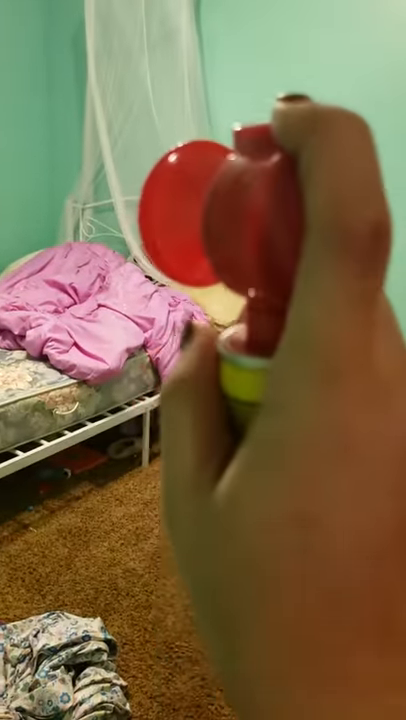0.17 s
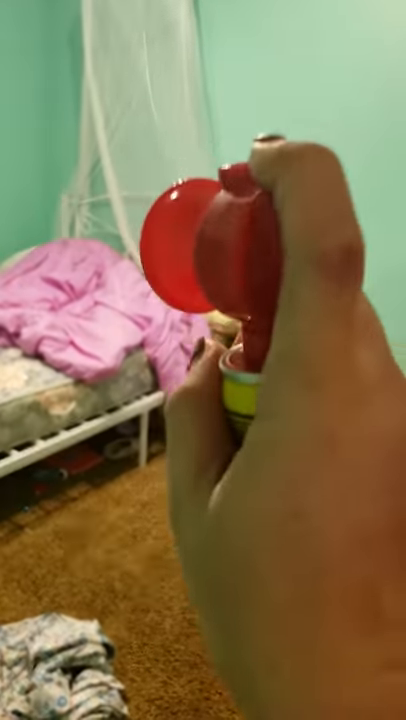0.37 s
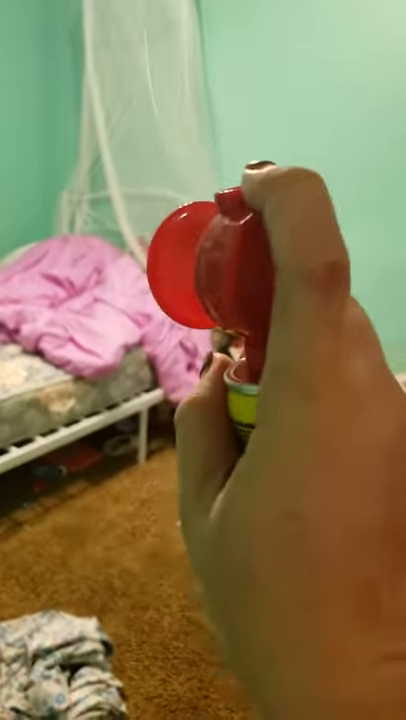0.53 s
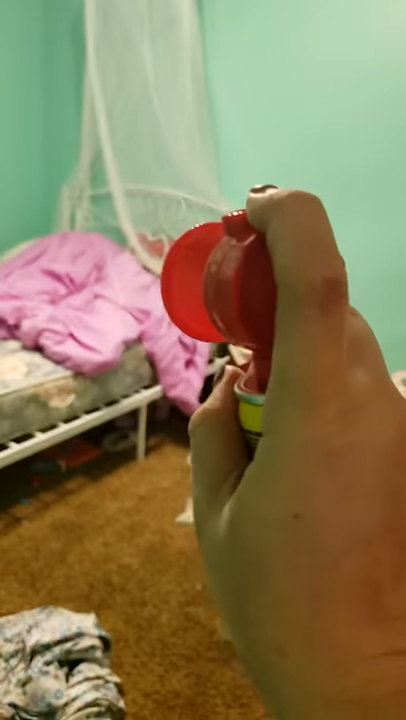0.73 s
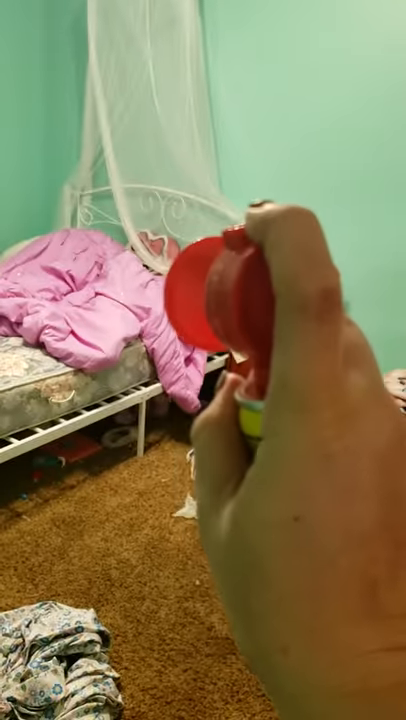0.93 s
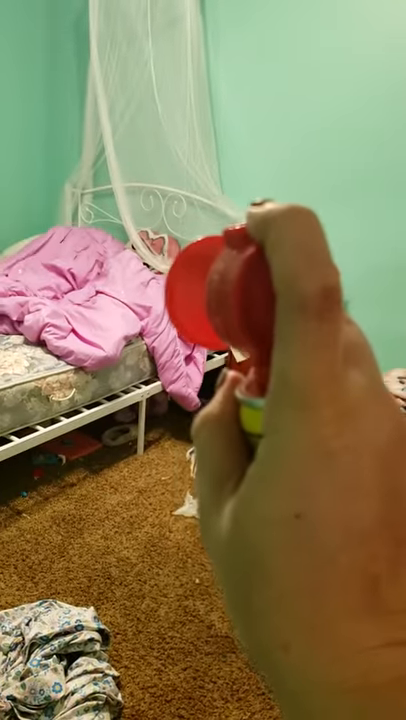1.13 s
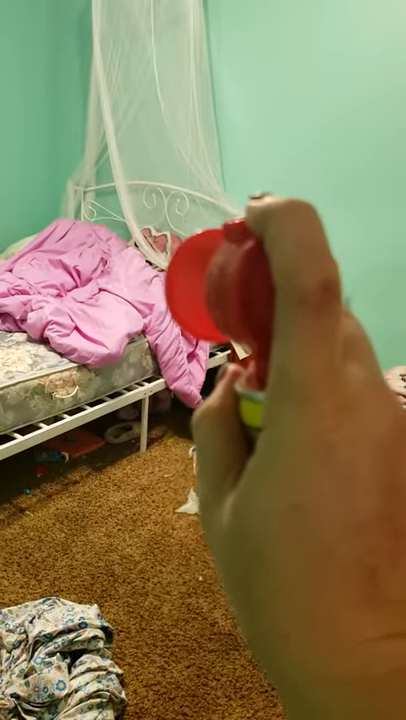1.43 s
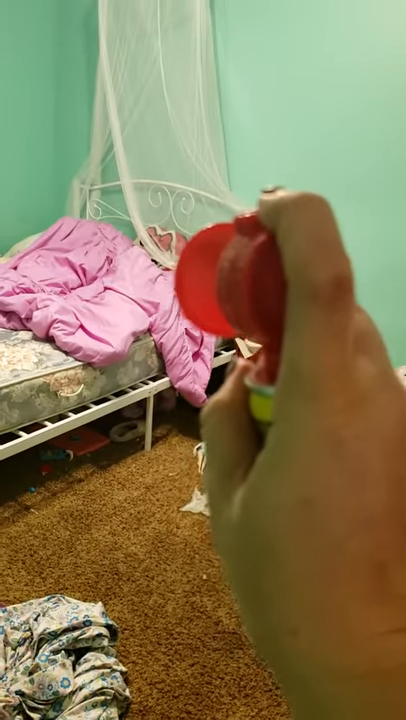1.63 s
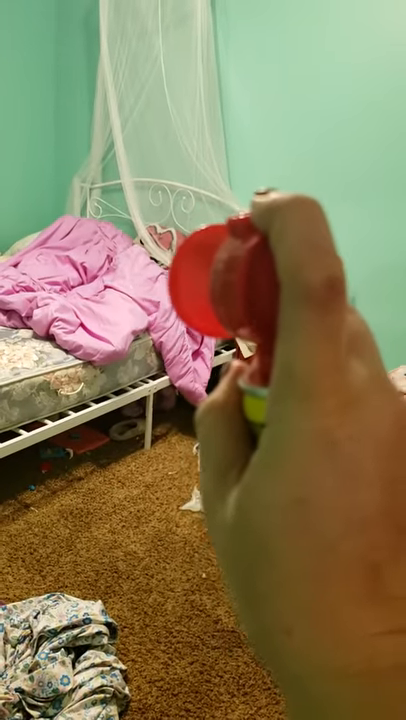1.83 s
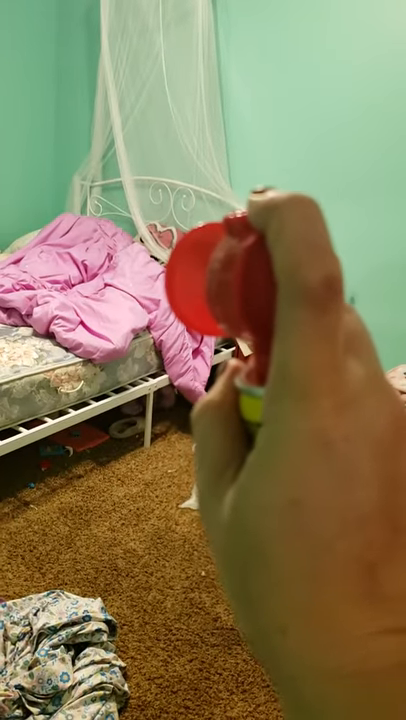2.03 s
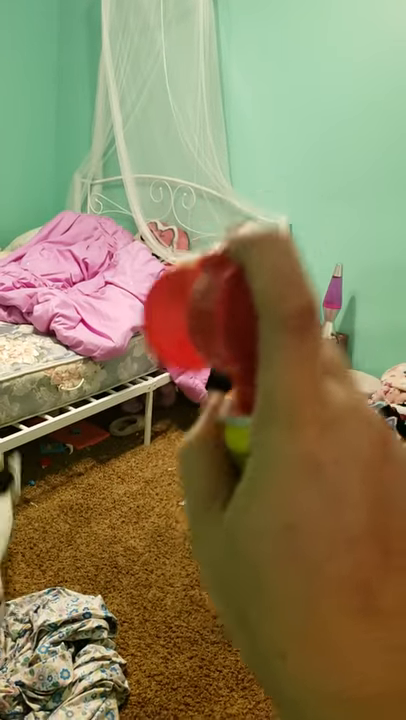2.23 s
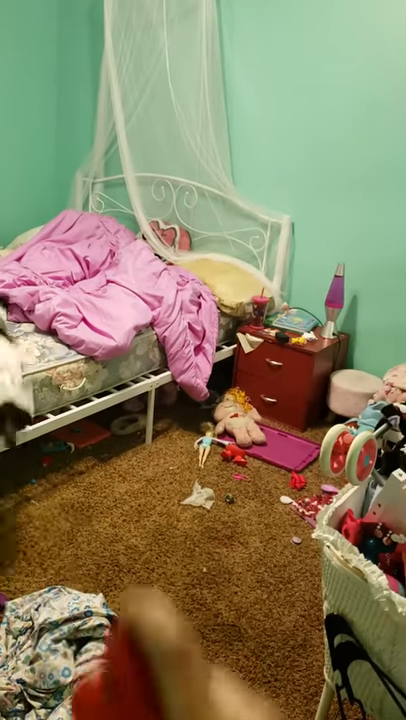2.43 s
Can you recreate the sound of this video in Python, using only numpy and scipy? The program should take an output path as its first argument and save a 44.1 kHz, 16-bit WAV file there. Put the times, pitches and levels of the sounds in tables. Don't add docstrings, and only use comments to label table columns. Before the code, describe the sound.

One piercing air horn blast, close to a phone microphone that clamps its level down; brief quiet room first, steady bright tone for about two seconds, sudden cutoff, faint gas spits and a short indoor tail.

```python
import sys
import numpy as np
from scipy import signal
from scipy.fft import rfft, irfft
from scipy.io import wavfile
from scipy.ndimage import uniform_filter1d, minimum_filter1d

SR = 44100
rng = np.random.default_rng(int(sys.argv[2]) if len(sys.argv) > 2 else 0)


def bounce(signal):
    frames = np.transpose(np.atleast_2d(signal))
    limited = np.clip(frames, -1, 1)
    pcm = np.round(limited * 32767).astype(np.int16)
    wavfile.write(sys.argv[1], SR, pcm)


def makeup_ratio(level_db):
    decades = np.asarray(level_db, float) / 20
    return 10 ** decades


N = 114660
CATCH_S, RISE_S = 0.2293, 0.013
SHUT_S, RELEASE_DB_PER_S = 2.337, 297

# frequency_hz, likeness [0-1]
COHERENCE = [(40, .9), (150, .75), (400, .5), (2000, .3)]


def evened(x):
    return x / np.sqrt(np.mean(x ** 2) + 1e-20)


def read(points, hz):
    f, value = np.transpose(points)
    return np.interp(np.log(hz + 1), np.log(f + 1), value)


def filtered(x, response):
    return irfft(rfft(x) * makeup_ratio(read(response, np.fft.rfftfreq(N, 1 / SR))), N)


def noise(colour, patchy_db):
    frames, hz = N // 256 + 5, np.fft.rfftfreq(1024, 1 / SR)
    a, b, c, d, patches = rng.standard_normal((frames, 513, 5)).T
    patches = uniform_filter1d(patches, size=14, axis=0)
    patches = evened(uniform_filter1d(patches, size=8, axis=1))
    like = np.clip(read(COHERENCE, hz), -1, 1)[:, None]
    left = a + 1j * b
    right = like * left + np.sqrt(1 - like ** 2) * (c + 1j * d)
    spectra = np.array([left, right])
    spectra *= makeup_ratio(read(colour, hz)[:, None] + patchy_db * patches)
    return evened(signal.istft(spectra, nperseg=1024, noverlap=768)[1][:, :N])


def drift(top_hz):
    t = np.arange(N) / SR
    rates_hz = np.geomspace(2, top_hz, num=16)
    return evened(sum(np.sin(2 * np.pi * (f * t + rng.random())) / np.sqrt(f) for f in rates_hz))


def lag(x, s):
    r = np.exp(-1 / (s * SR))
    return signal.lfilter([1 - r], [1, -r], x)


def valve(t):
    return makeup_ratio(-RELEASE_DB_PER_S * np.maximum(t - SHUT_S, 0))


def room_floor():
    # frequency_hz, density_db [dB per Hz]
    floor_colour = [(15, -35.5), (25, -7), (97, -5), (354, -25), (911, -41), (1740, -34.5), (2050, -43.5),
                    (2550, -45.5), (16000, -31.5)]
    quiet = makeup_ratio(-53.5) * noise(floor_colour, 3)
    low = signal.sosfilt(signal.butter(2, 300, fs=SR, output="sos"), quiet)
    return quiet + low * (makeup_ratio(2.5 * drift(16) - 1.5) - 1)


def gas(t):
    # frequency_hz, density_db [dB per Hz]
    gas_colour = [(1000, -42), (1700, 3), (2800, -16), (3900, 3.5), (5200, -26), (7500, -2.5), (9000, 1),
                  (12500, -5.5)]
    # frequency_hz, density_db [dB per Hz]
    jet_colour = [(3000, -29.5), (6000, -14.5), (9000, -3), (12500, -0.5), (15500, 4)]
    # frequency_hz, density_db [dB per Hz]
    spit_colour = [(3000, -45), (4500, -23.5), (7000, -13.5), (10000, -13.5), (12500, 1.5), (15000, -14)]
    # centre_s, length_s, level_db
    spit_events = [
        (1.349, 0.081, -45),
        (1.644, 0.049, -28),
        (2.237, 0.036, -38),
        (2.54, 0.035, -48),
        (2.595, 0.054, -39),
    ]
    age = np.maximum(t - CATCH_S, 0)
    caught = np.minimum(age / RISE_S, 1)
    opening = np.clip((t - 0.19) / 0.035, 0, 1)
    opening = opening * np.exp(-age / 0.04) * makeup_ratio(-41 + 15.5 * caught)
    jet = makeup_ratio(-37.5) * caught * valve(t)
    spits = sum(makeup_ratio(db) * np.exp(-((t - s) / (length / 2)) ** 2) for s, length, db in spit_events)
    hiss = opening * noise(gas_colour, 4)
    hiss = hiss + jet * noise(jet_colour, 4.4) + spits * noise(spit_colour, 2.1)
    pan_db = -3.5
    return hiss * makeup_ratio([[pan_db / 2], [-pan_db / 2]])


def horn(t):
    # time_s, pitch_hz
    note_path = [(.2, 999.7), (.5, 1017), (.68, 1013), (.82, 1009), (1, 1010), (1.14, 1011), (1.4, 1010.7),
                 (1.62, 1011), (1.74, 1007), (1.96, 1008), (2.1, 1004), (2.3, 1005), (2.37, 1019),
                 (2.45, 1034)]
    # time_s, turn_db [toward the right port]
    aim_path = [(.2, -1.5), (.5, 7.5), (.7, 6), (1, 5), (1.3, 6.5), (1.6, 7.5), (1.75, 17.5), (2.05, 12),
                (2.25, 15.5), (2.4, 17.5)]
    # left_db, right_db, left_loss [share of turn], right_gain [share of turn]
    overtones = [(0, -1.5, 0.65, .3), (5, -0.5, 0.46, .2), (-2, -5.5, 0.74, 0.13),
                 (-27.5, -25, -1.1, 0.045), (-38, -31.5, 1, 0.06), (-35.5, -35.5, -1.1, 0.28),
                 (-41, -32, 1, 0.074), (-42.5, -27.5, -0.035, 0.21), (-50.5, -29, 0.33, 0.036),
                 (-30, -38.5, 0.65, .1), (-40, -32.5, 0.41, .1), (-51, -32, .1, .1), (-40.5, -29.5, .1, .1),
                 (-36.5, -37.5, .1, .1), (-33.5, -32, .1, .1)]
    # frequency_hz, lead_rad
    phase_lead = [(1000, 1.7), (2000, 2.1), (3000, .9), (4000, 1.8)]
    # frequency_hz, gain_db
    bell_response = [(1000, 3.5), (2000, 12.5), (2800, -1), (4000, -14.5), (6000, -9.5), (8500, -1),
                     (11500, 4.5), (16000, 7.5)]
    # centre_s, width_s, frequency_hz, left_db, right_db
    nulls = [
        (0.49, 0.25, 2020, 3, -6.5),
        (0.52, 0.26, 3030, -14.5, -11.5),
        (2.33, 0.086, 2020, -13.5, -9.5),
        (1.73, 0.15, 6060, -16.5, -20),
        (2.3, 0.1, 4040, -7, -6),
        (.42, 0.095, 4040, 4.5, 12),
        (1.7, 0.14, 4040, -11, -9.5),
        (0.39, 0.076, 5050, 3.5, 8.5),
        (2, 0.49, 6060, -8, -8),
    ]
    slide_hz, slide_s = 896, 0.028
    bright_db, bright_s = 4, 0.12
    shimmer_db = 4
    nominal_hz = note_path[0][1]

    age = np.maximum(t - CATCH_S, 0)
    steady = uniform_filter1d(np.interp(t, *np.transpose(note_path)), size=2000) + .35 * drift(40)
    hz = steady + slide_hz * np.exp(-age / slide_s)
    phase = 2 * np.pi * np.cumsum(hz) / SR
    aim_db = np.interp(t, *np.transpose(aim_path))
    near, thrown, wander = np.zeros((2, N)), np.zeros(N), drift(35)
    for k, (left_db, right_db, lose, gain) in enumerate(overtones, start=1):
        upper = k > 3
        edge_db = bright_db * upper * np.exp(-age / bright_s)
        edge = makeup_ratio(edge_db + read(bell_response, k * hz) - read(bell_response, k * steady))
        late_s = 0.0029 * min(k - 1, 3)
        edge = edge * np.clip((age - late_s) / RISE_S, 0, 1) ** 2
        edge = edge * np.clip((17500 - k * hz) / 1000, 0, 1)
        at = k * phase + 2 * np.pi * rng.random()
        port_db = np.array([left_db - lose * aim_db, right_db + gain * aim_db])
        shimmer = np.array([np.roll(wander, step) for step in rng.integers(0, N, 2)])
        port_db += shimmer_db * upper * shimmer
        for s, width, null_hz, *dbs in nulls:
            if round(null_hz / nominal_hz) == k:
                port_db += np.outer(dbs, np.exp(-((t - s) / width) ** 2))
        near += edge * makeup_ratio(port_db) * np.cos([at + read(phase_lead, k * nominal_hz), at])
        thrown += edge * makeup_ratio((left_db + right_db) / 2) * np.cos(at)
    shape = np.sqrt(2) * valve(t) * makeup_ratio(.25 * drift(30))
    blast = makeup_ratio(-3 * np.exp(-age / 0.11))
    return near * shape, thrown * shape * blast


def echoes(x, t):
    # frequency_hz, gain_db
    echo_tilt = [(1300, -5.5), (2500, 0), (4000, 2), (12000, 6.5)]
    # left_s, right_s, level_db
    reflections = [
        (.0031, 0.0035, -3),
        (.0062, 0.0059, -5.5),
        (.0095, .0107, -10.5),
        (.0138, .0127, -8.5),
        (.0181, .0196, -11.5),
        (.0247, .0229, -13),
        (.031, .0335, -14.5),
    ]
    fed = filtered(x, echo_tilt) * np.exp(-(np.maximum(t - CATCH_S, 0) / 0.07) ** 2)
    out = np.zeros((2, N))
    for k, (*delays, db) in enumerate(reflections):
        out += (-1) ** k * makeup_ratio(db) * np.array([np.roll(fed, round(s * SR)) for s in delays])
    return out


def walls(x, t):
    # frequency_hz, t60_s
    decay_times = [(500, .5), (1500, .45), (3000, .36), (5000, .22), (12000, .16)]
    # frequency_hz, gain_db
    room_gain = [(1000, -13.5), (2000, -29.5), (3000, -16), (5000, 2.5), (12000, 2.5)]
    out = np.zeros((2, N))
    x = filtered(x, room_gain)
    for j in range(3):
        taps = np.zeros((2, SR // 2))
        at = np.arange(200, SR // 2 - 20, 20) + rng.integers(0, 20, (2, (SR // 2 - 201) // 20))
        np.put_along_axis(taps, at, rng.choice([-1., 1.], at.shape), 1)
        hz, s, z = signal.stft(taps, SR, nperseg=256)
        t60 = read(decay_times, hz)[:, None]
        z = z * makeup_ratio(-60 * s / t60) / np.sqrt(t60)
        tail = signal.istft(z, SR, nperseg=256)[1]
        tail = tail / np.linalg.norm(tail[0])
        window = np.sqrt(2 / 3) * np.cos(np.pi * (.12 * t + j / 3))
        out += signal.fftconvolve((x * window)[None], tail, axes=1)[:, :N]
    return out


def handling(t):
    # start_s, decay_s, level_db
    thumps = [(.25, 0.077, -44.5), (.35, 0.036, -51), (.5, 0.058, -50.5), (.7, 0.15, -45),
              (.87, 0.053, -47), (1.23, 0.048, -49.5), (1.29, 0.087, -44), (1.41, 0.053, -44.5),
              (1.78, .06, -90.5), (2.149, 0.061, -57), (2.266, 0.089, -37)]
    # frequency_hz, density_db [dB per Hz]
    thump_colour = [(40, -1.5), (140, -4.5), (300, -6.5), (600, -17), (1000, -43.5)]
    rubs = np.zeros(N)
    for s, decay, db in thumps:
        onset = np.clip((t - s) / 0.0069, 0, 1)
        rubs += makeup_ratio(db) * onset * np.exp(-np.maximum(t - s, 0) / decay)
    return rubs * noise(thump_colour, 2.8)


def scene():
    t = np.arange(N) / SR
    quiet = room_floor()
    hiss = gas(t)
    near, thrown = horn(t)
    reverberation = walls(thrown + .4 * hiss.mean(0), t)
    return near + hiss + echoes(thrown, t) + reverberation + handling(t) + quiet


def roll_off(x):
    return signal.sosfilt(signal.butter(12, 16640, fs=SR, output="sos"), x)


def record(dry):
    knee_db, recover_db_per_s = -28.5, 3
    quick_db, quick_s, slow_db, slow_s = 8.5, .005, 14, 0.12
    power_db = 10 * np.log10(abs(uniform_filter1d((dry ** 2).mean(0), size=200)) + 1e-12)
    loud = np.clip((power_db - knee_db) / 20, 0, 1)
    fall = np.arange(N) * recover_db_per_s / (quick_db + slow_db) / SR
    held = np.maximum.accumulate(loud + fall) - fall
    gain_db = -quick_db * lag(held, quick_s) - slow_db * lag(lag(held, slow_s), slow_s)
    ducked = dry * makeup_ratio(gain_db)
    lowpass = signal.firwin(511, 15850, window=("kaiser", 9), fs=SR)
    ducked = signal.oaconvolve(ducked, lowpass[None], "same")
    headroom = minimum_filter1d(np.minimum(.99 / (abs(ducked).max(0) + 1e-9), 1), size=400)
    return roll_off(ducked * uniform_filter1d(headroom, size=200))


dry = scene()
out = record(dry)
bounce(out)
```